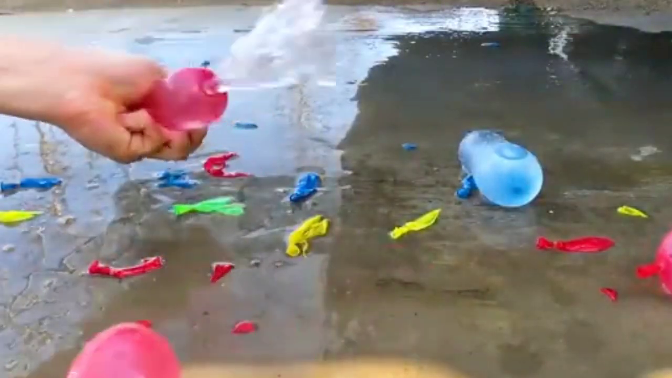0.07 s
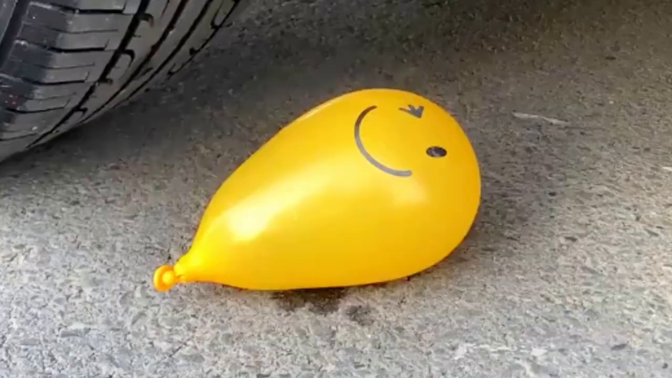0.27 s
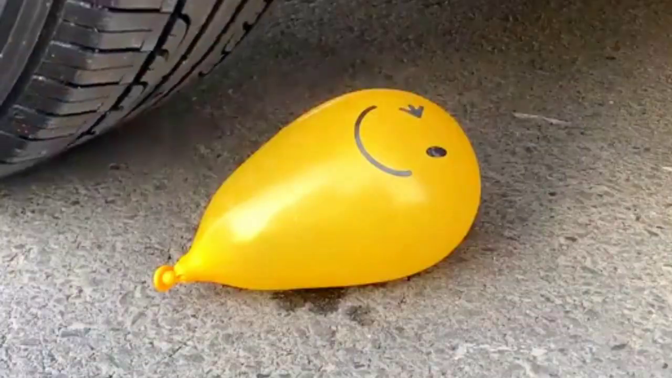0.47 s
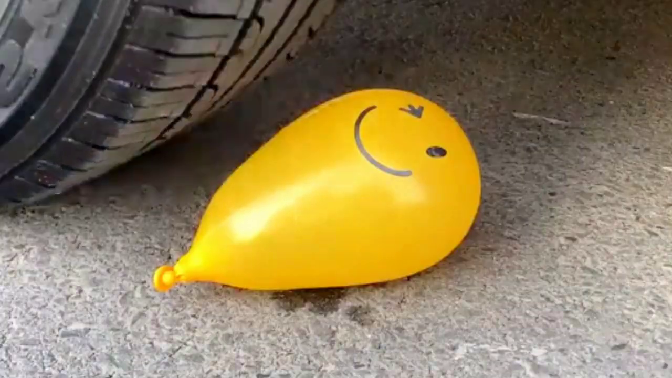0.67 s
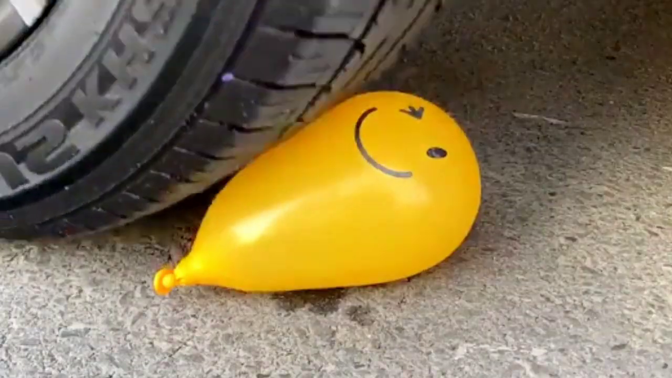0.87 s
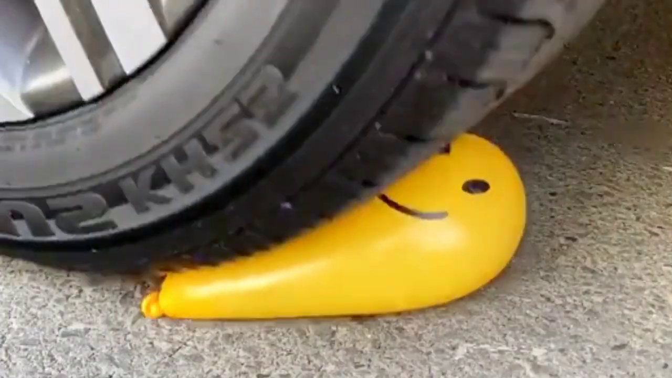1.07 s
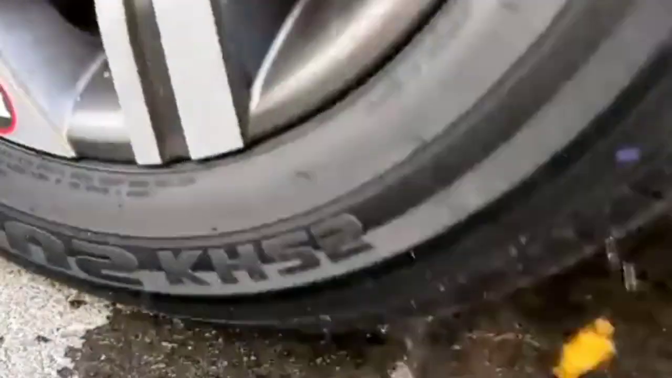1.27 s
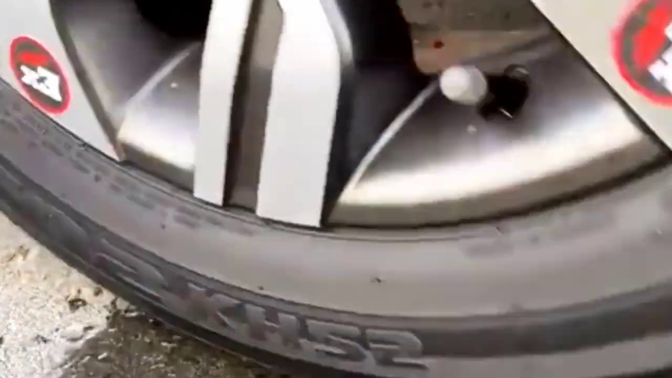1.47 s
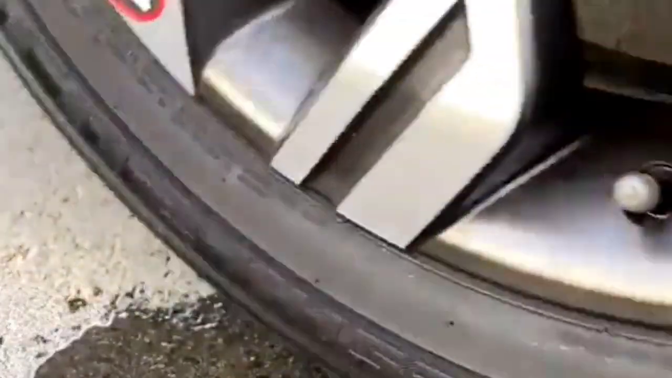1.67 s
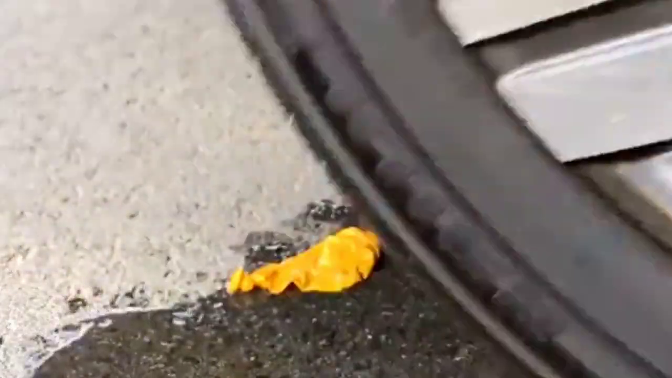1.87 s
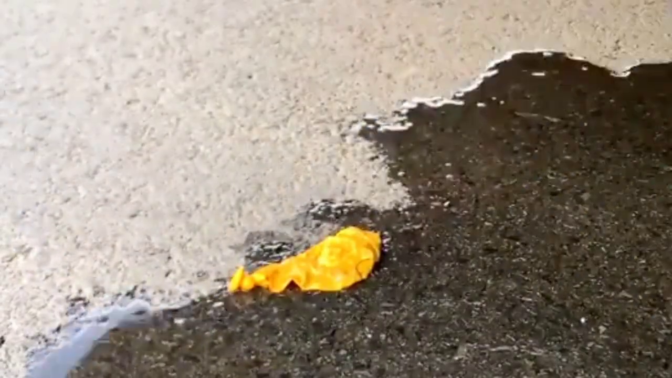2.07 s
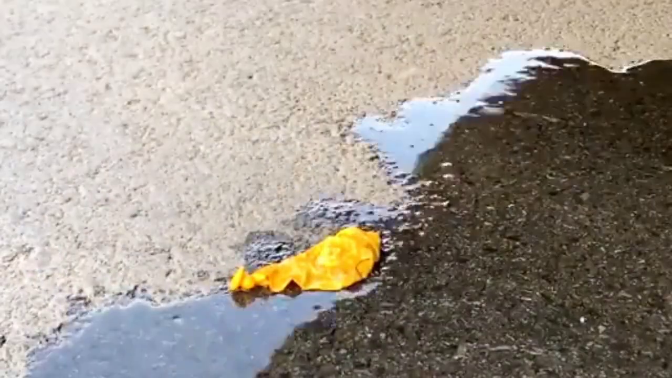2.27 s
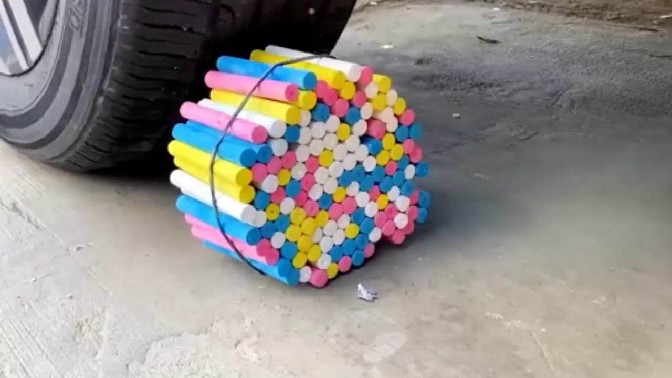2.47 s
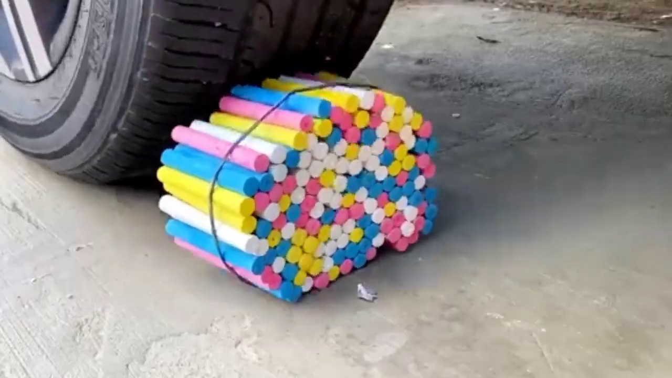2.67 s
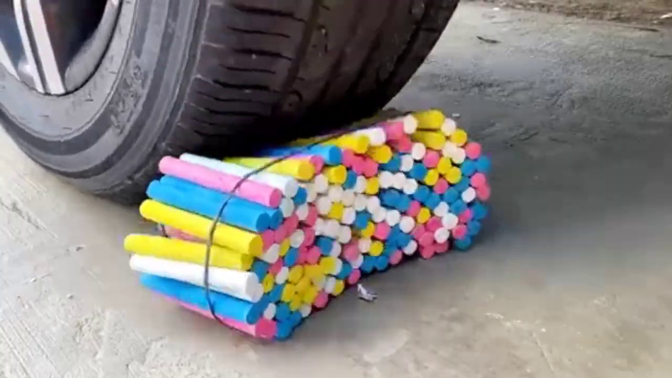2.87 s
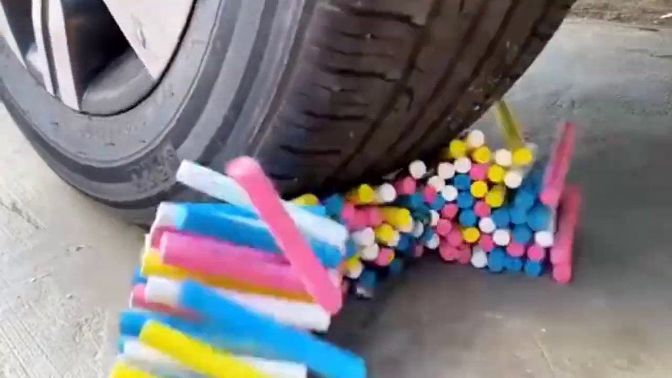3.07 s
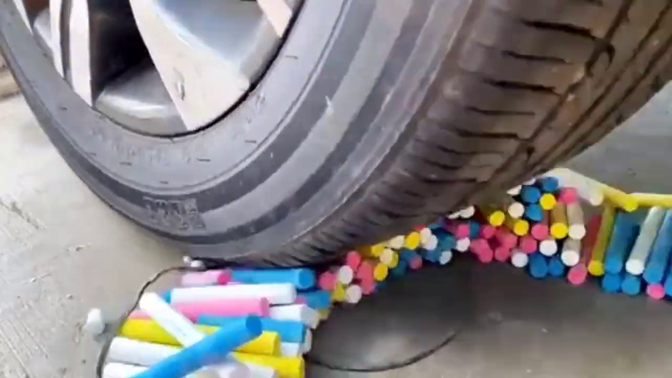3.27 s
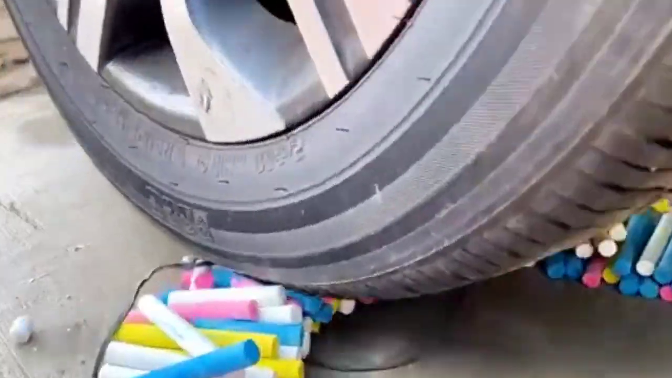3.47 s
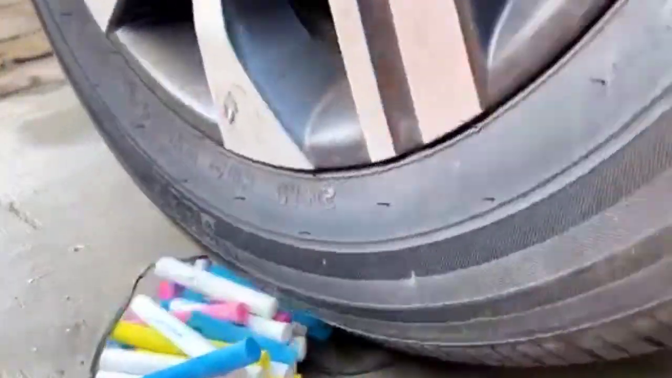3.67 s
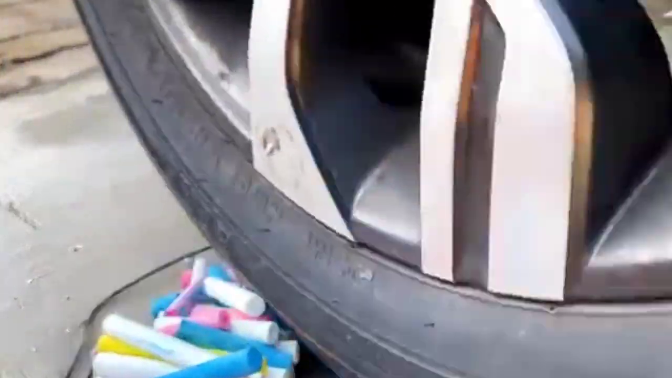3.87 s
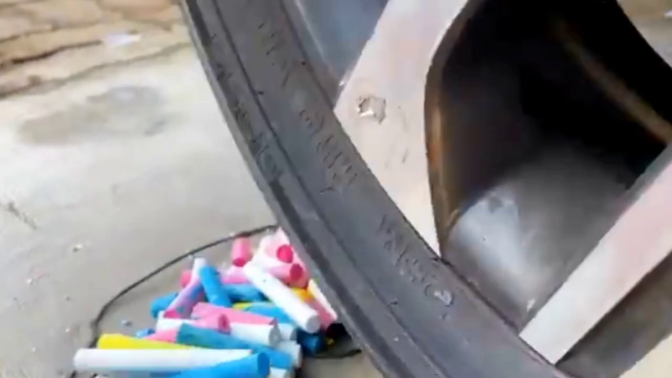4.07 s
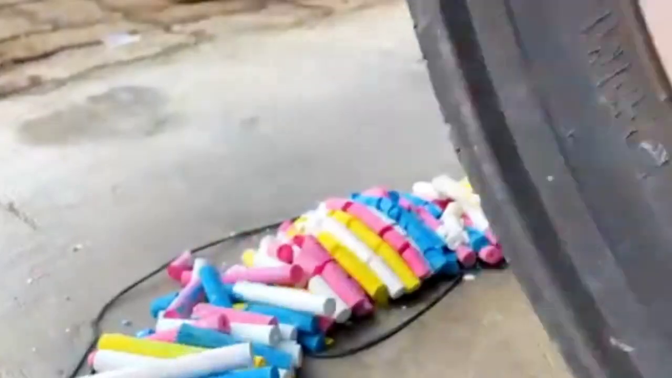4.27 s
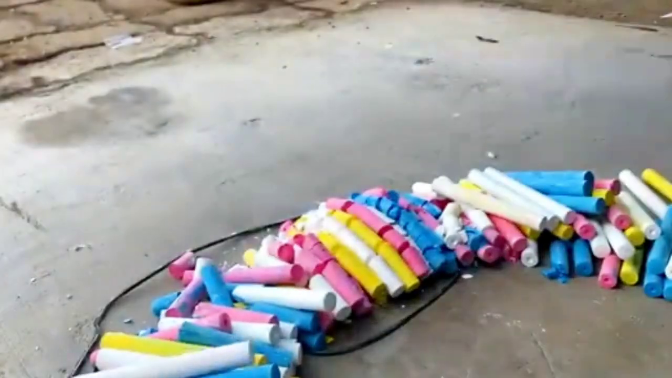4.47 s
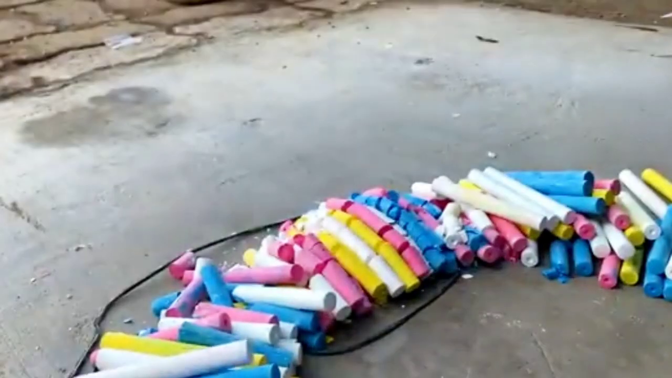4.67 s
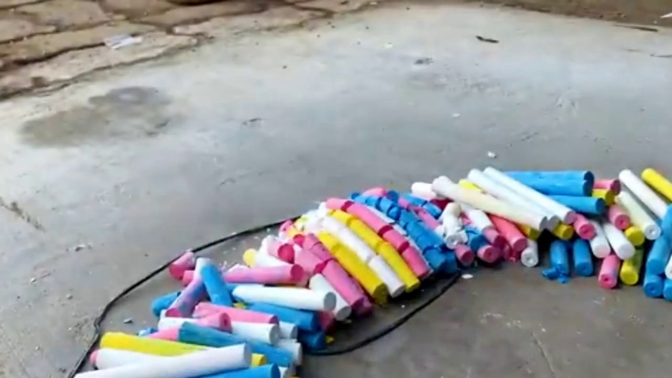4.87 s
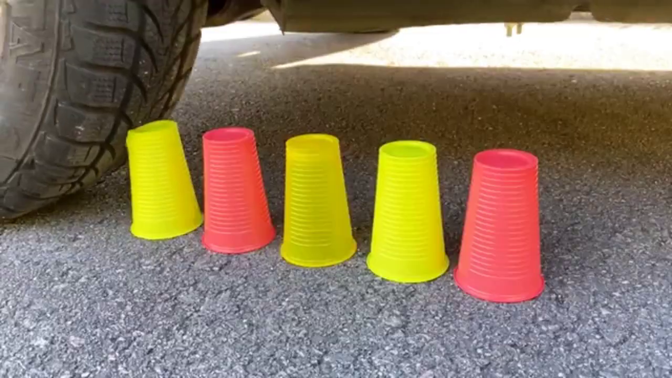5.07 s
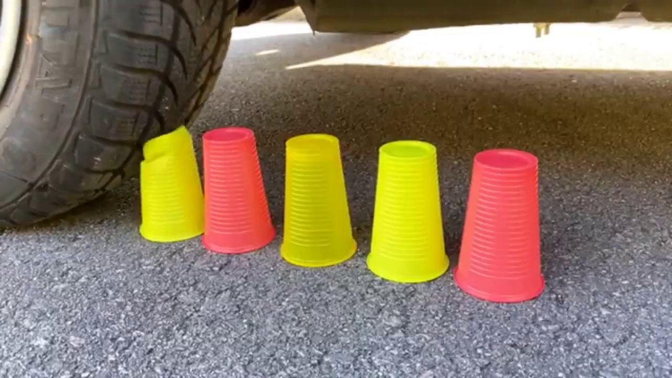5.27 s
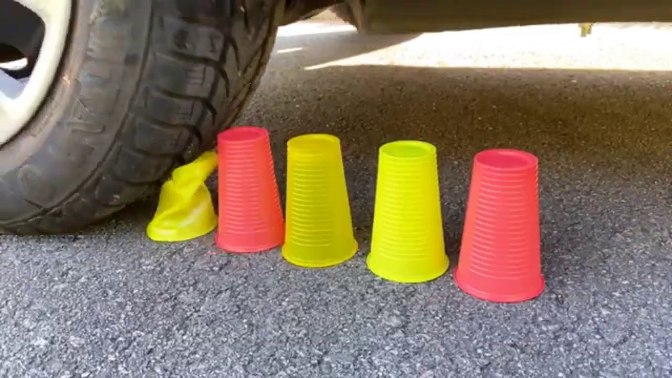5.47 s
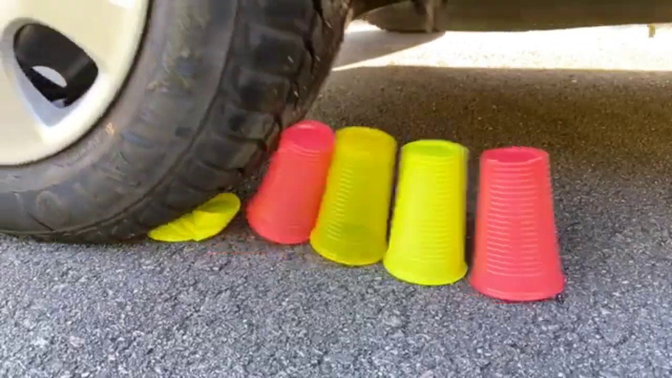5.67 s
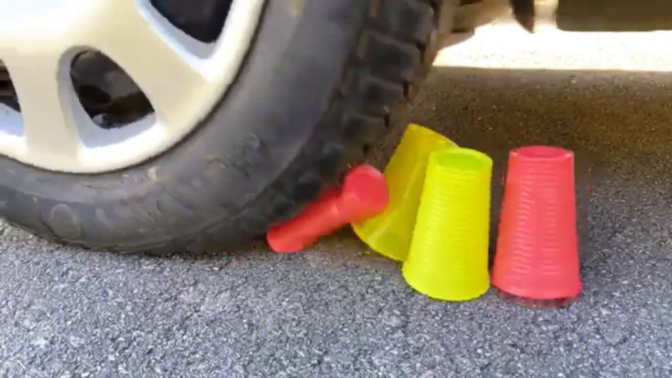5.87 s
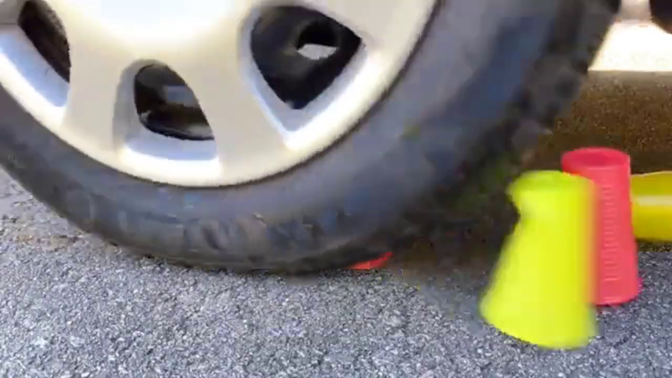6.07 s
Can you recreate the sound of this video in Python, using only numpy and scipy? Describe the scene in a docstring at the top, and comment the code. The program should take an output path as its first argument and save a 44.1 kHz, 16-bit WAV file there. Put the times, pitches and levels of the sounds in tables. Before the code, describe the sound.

A water balloon splashes, a slow tyre squeaks and bursts another, then grinds and snaps a chalk bundle and crumples plastic cups in gusting wind.

```python
"""Tyre over water balloons, chalk and cups

Four close outdoor scenes in a row. A water balloon splashes from a hand: sinking spray and chirping bubbles.
A tyre bursts another and hisses through the puddle: squeaking rubber, a rip, slaps and wet noise.
It crushes a bundle of chalk: clumped fractures grind, bar modes squeal and resonant cracks snap.
It crumples plastic cups: thin walls crackle and buckle while wind noise buffets the microphone.
Filtered noise gives the outdoor air and rolling tyres; gliding low tones give the engine."""
import sys
import numpy as np
from scipy import signal
from scipy.fft import rfft, irfft, next_fast_len
from scipy.io import wavfile
from scipy.ndimage import uniform_filter1d

SR = 44100
rng = np.random.default_rng(int(sys.argv[2]) if len(sys.argv) > 2 else 0)


def materialize(psi):
    """Save the field psi as 16-bit PCM at rate SR to the path in sys.argv[1].

    A 1-D psi becomes a single channel; in a 2-D psi each row is a channel.
    """
    bounded = np.clip(np.atleast_2d(psi).T, -1, 1)
    quanta = np.round(bounded * 32767).astype(np.int16)
    wavfile.write(sys.argv[1], SR, quanta)


N = 270774
TIME = np.arange(N) / SR
HIT_SIZE = 8192  # samples in one short sound
LEVEL_WINDOW_S = .01  # burst length that defines the level of a short sound


def undb(db):
    """Decibels to gain."""
    return 10 ** (np.asarray(db) / 20)


def unit(x):
    """Scale to an rms of one."""
    return x / np.sqrt(np.mean(x ** 2) + 1e-20)


def decay(t, t60):
    """Exponential decay that falls 60 dB in t60 seconds."""
    return np.exp(-np.log(1000) * t / t60)


def gains(table):
    """One gain curve for each dB column, silent outside the table."""
    s, *columns = np.transpose(table)
    return [undb(np.interp(TIME, s, c, left=-150, right=-150)) for c in columns]


def swell(start, end, rise_s, fall_s):
    """Attack, hold and release; rise and fall are the times for 60 dB."""
    before = (start - TIME) / max(rise_s, 1e-3)
    after = (TIME - end) / max(fall_s, 1e-3)
    return decay(np.clip(np.maximum(before, after), 0, 10), 1)


def pan(left_db):
    """Left and right gains for a level difference."""
    return undb(np.array([[left_db], [-left_db]]) / 2)


def stereo(three, likeness):
    """Two channels from one shared and two separate signals."""
    share = np.clip(likeness, 0, 1)
    return np.sqrt(share) * three[0] + np.sqrt(1 - share) * three[1:]


def response(points, size):
    """Causal frequency response through (frequency [Hz], level [dB]) points, by folding the cepstrum."""
    hz, db = np.transpose(points)
    freq = np.maximum(np.arange(size // 2 + 1) * SR / size, 1)
    target_db = np.interp(np.log(freq), np.log(hz), db)
    cepstrum = irfft(np.log(undb(target_db)))
    cepstrum[1:size // 2] *= 2
    cepstrum[size // 2 + 1:] = 0
    return np.exp(rfft(cepstrum))


def colour(x, points):
    """Give a sound a spectrum."""
    size = 2 * next_fast_len(x.shape[-1] // 2 + 1, True)
    return irfft(rfft(x, size) * response(points, size))[..., :x.shape[-1]]


def noise(points, likeness):
    """Coloured stereo noise of unit level."""
    return unit(colour(stereo(rng.standard_normal((3, N)), likeness), points))


# body, crack and fizz bands: (low edge [Hz], high edge [Hz])
BANDS = [(120, 1400), (1400, 5000), (5000, 16500)]


def band_filters():
    """Band-passes for body, crack and fizz."""
    return [signal.butter(3, edges, "band", fs=SR, output="sos") for edges in BANDS]


def band_levels(crack_db, bright_db, fizz_db, fizz_share):
    """Body, crack and fizz in dB: a brighter break has less body; fizz_share sets how fizz follows."""
    return np.array([crack_db - bright_db, crack_db, crack_db + fizz_db + fizz_share * bright_db])


def voiced(table, fizz_db, fizz_share):
    """Spread each snap of one material over body, crack and fizz."""
    return [(s, *band_levels(db, bright, fizz_db, fizz_share), *ring) for s, db, bright, *ring in table]


def bouts(table, rise_s, fall_s, fizz_db, fizz_share):
    """Body, crack and fizz gains of short bouts of crushing that share one attack and release."""
    power = 0
    for s, length, db, bright in table:
        levels = undb(band_levels(db, bright, fizz_db, fizz_share))
        power = power + np.outer(levels, swell(s, s + length, rise_s, fall_s)) ** 2
    return np.sqrt(power)


def split(force, body_db, fizz_db):
    """Body, crack and fizz gains that follow one force."""
    return np.outer(undb([body_db, 0, fizz_db]), force)


def cracks(size, rate, spread_db):
    """Three streams of tiny fractures, rate per second: many small, a few large."""
    happens = rng.random((3, size)) < rate / SR
    strength = undb(spread_db * np.minimum(rng.exponential(size=(3, size)), 4))
    return unit(happens * strength * rng.choice([-1, 1], (3, size)))


def add(out, s, sound):
    """Mix a short sound in at a time."""
    start = int(np.clip(s * SR, 0, N - 1))
    out[:, start:start + sound.shape[-1]] += sound[..., :N - start]


def blow(sound, db):
    """Scale a short sound to the energy of a 10 ms burst at this level."""
    energy = np.mean(sound ** 2) * sound.shape[-1]
    return sound * undb(db) * np.sqrt(LEVEL_WINDOW_S * SR / (energy + 1e-20))


def mode(hz, t60):
    """A ringing mode that reaches each side with its own phase."""
    t = np.arange(HIT_SIZE // 4) / SR
    phase = rng.normal(0, 1.0, (2, 1))
    return np.sin(2 * np.pi * hz * t + phase) * decay(t, t60)


def panel(size, ring_hz, ring_db, sharpness, overtone_db):
    """Response of a fragment: a main resonance and two overtones at random ratios, on a flat base."""
    freq = np.arange(1, size // 2 + 2) * SR / size
    modes = ring_hz * np.cumprod([1, *rng.uniform(1.2, 2.1, 2)])[:, None]
    resonances = 1 / (1 + 1j * sharpness * (freq / modes - modes / freq))
    return 1 + undb([ring_db, ring_db + overtone_db, ring_db + overtone_db]) @ resonances


# a faint, fast rise of noise comes just before each snap:
# start before it [s], time for 60 dB of rise [s], level [dB re the full attack]
PRE_S, PRE_RISE_S, PRE_DB = .02, .025, -17.5


def snaps(table, points, first_break, rise_s, likeness, left_db):
    """A short noise rise leads into a sharp attack that dies in fractures; shorter snaps break cleaner."""
    out = np.zeros((2, N))
    t = np.arange(HIT_SIZE) / SR - PRE_S
    material, filters = response(points, HIT_SIZE), band_filters()
    early = undb(PRE_DB) * decay(-np.minimum(t, 0), PRE_RISE_S)
    attack = np.maximum(early, np.clip(t / max(rise_s, 1e-4), 0, 1))
    release = int((PRE_S + np.clip(rise_s, 0, .005)) * SR)
    for s, *levels, t60, ring_hz, ring_db in table:
        run = cracks(HIT_SIZE, 7000, 3.2) * attack
        body = material * panel(HIT_SIZE, ring_hz, ring_db, sharpness=7.2, overtone_db=-7.5)
        for k, (db, sos) in enumerate(zip(levels, filters)):
            life = max(t60, .004) * (1.15, .95, .8)[k]  # higher bands die sooner
            force = unit(stereo(run, likeness[k]) * decay(np.maximum(t, 0), life))
            force[:, release] += first_break * np.sqrt(HIT_SIZE) * (0.025 / life) ** .7
            sound = signal.sosfilt(sos, irfft(rfft(force) * body))
            add(out, s - PRE_S - rise_s / 2, blow(sound * pan(left_db[k]), db))
    return out


def crackle(levels, points, rate, spread_db, clump_db, likeness, left_db):
    """Dense small fractures that come in clumps of a few milliseconds."""
    clumps = undb(clump_db * unit(uniform_filter1d(rng.standard_normal(N), size=220)))
    grains = colour(cracks(N, rate, spread_db) * clumps, points)
    out = 0
    for gain, sos, alike, side in zip(levels, band_filters(), likeness, left_db):
        out = out + gain * unit(signal.sosfilt(sos, stereo(grains, alike)) * pan(side))
    return out


def ticks(gain, span, low_hz, high_hz, cycles, spread_db, count):
    """Small pieces give way one by one, each with a short ring of its own pitch."""
    out = np.zeros((2, N))
    times = np.linspace(*span, count)
    for s, (late, pitch, force) in zip(times, rng.random((count, 3))):
        hz = low_hz * (high_hz / low_hz) ** pitch
        add(out, s + 0.013 * late, blow(mode(hz, cycles / hz), spread_db * force))
    sounding = (times[-1] - times[0]) * SR / N
    return unit(out) * np.sqrt(sounding) * gain


def underbody(x, t60, wet_db):
    """Short diffuse reflections between the pavement and the car."""
    t = np.arange(HIT_SIZE) / SR
    echoes = rng.standard_normal((2, HIT_SIZE)) * decay(t, t60) * (t > .003)
    reflected = signal.fftconvolve(x, unit(echoes) / np.sqrt(HIT_SIZE), axes=1)[:, :N]
    return x + undb(wet_db) * reflected


# outdoor background, each row holds until the next: (start [s], rumble [dB], roar [dB], hiss [dB])
BACKGROUNDS = [(0, -59, -51, -53), (.3, -71, -59.5, -60), (2.38, -69.5, -63.5, -61),
               (4.45, -72, -66.5, -67)]
# a tyre rolling close by: (start [s], end [s], rumble [dB], roar [dB], hiss [dB])
ROLLS = [(0.312, 1.27, -71, -57, -55), (1.422, 1.823, -60.5, -48.5, -58.5),
         (2.722, 4.418, -55.5, -49.5, -61.5)]
# the background dips briefly: (middle [s], half length [s], depth [dB])
DIPS = [(.299, 0.01, -49), (1.32, 0.036, -10), (2.383, 0.007, -13.5)]
# spectra of rumble, roar and hiss: (frequency [Hz], relative level [dB])
RUMBLE_COLOUR = [(15, -11), (42, 2), (65, -3), (130, -10.5), (200, -17), (320, -34.5)]
ROAR_COLOUR = [(100, -15), (200, -15.5), (300, -24), (420, -16), (580, 2), (740, 2), (1000, 2.5),
               (1400, -14), (3000, -22)]
AIR_COLOUR = [(500, -23), (1200, -2), (2400, 1), (4500, -4), (6000, -8.5), (7500, -3), (9200, -15),
              (11200, -7), (15000, -10)]


def car():
    """Low rumble and the soft, uneven roar of slow tyres, in a thin outdoor hiss."""
    backgrounds = np.array(BACKGROUNDS)
    current = np.searchsorted(backgrounds[1:, 0], TIME)
    levels = undb(backgrounds[:, 1:])[current].T
    for start, end, *db in ROLLS:
        rolling = swell(start, end, rise_s=0.16, fall_s=.12)
        levels = np.hypot(levels, np.outer(undb(db), rolling))
    dip_db = sum(db * np.exp(-((TIME - s) / half) ** 4) for s, half, db in DIPS)
    rumble, roar, hiss = levels * undb(dip_db)
    knots = np.arange(0, N / SR, .05)
    uneven = undb(3.0 * np.interp(TIME, knots, rng.standard_normal(len(knots))))
    out = rumble * noise(RUMBLE_COLOUR, 0.89)
    out = out + roar * uneven * noise(ROAR_COLOUR, 0.017) * pan(1.0)
    return out + hiss * noise(AIR_COLOUR, 0.03) * pan(0.85)


# low engine tones, faint at first, far louder by the cups:
# (start [s], end [s], first pitch [Hz], last pitch [Hz], level [dB])
HUM = [(0, .25, 201.5, 197, -66.5), (.32, 2.65, 198.3, 198, -88.5), (2.7, 3.3, 190, 199, -71),
       (3.7, 4.15, 212, 220, -66), (5.35, 5.44, 133.5, 145, -32), (5.43, 5.48, 248, 267, -32),
       (5.43, 5.55, 181, 191, -31), (5.56, 5.61, 194.9, 218, -30.5), (5.59, 5.9, 244, 250, -33),
       (5.68, 5.8, 197.8, 186.4, -34.5), (5.72, 5.8, 260, 274, -33)]
WAVER = .45  # depth of the engine's wavering (share)


def engine():
    """Low tones that glide and waver as the engine takes up the load."""
    out = 0
    slow = signal.butter(2, 14, fs=SR, output="sos")
    waver = unit(signal.sosfilt(slow, rng.standard_normal((2, N))))
    for start, end, first_hz, last_hz, db in HUM:
        pitch_hz = np.interp(TIME, (start, end), (first_hz, last_hz))
        phase = 2 * np.pi * np.cumsum(pitch_hz) / SR
        # wavering both in and out of phase shakes level and pitch
        tone = unit((1 + WAVER * waver[0]) * np.sin(phase) + WAVER * waver[1] * np.cos(phase))
        out = out + undb(db) * swell(start, end, rise_s=0.11, fall_s=.14) * tone
    return out


# spray from the hand-held balloon: (time [s], flow level [dB], centre [Hz])
SPRAY = [(0.038, -68, 12530), (.062, -46, 11850), (0.077, -38, 11700), (0.109, -40.5, 9840),
         (0.143, -40, 5200), (.18, -41.5, 3934), (.255, -50.5, 3450), (0.284, -46, 3550)]
# spectrum of the drops: (frequency [Hz], relative level [dB])
SPRAY_COLOUR = [(1500, -5), (2300, 0), (2800, 3.5), (4300, 12), (6000, 3), (9000, 3.5), (12000, -2),
                (16000, -17)]


def spray():
    """Fine drops hiss around a sinking centre as the water spreads, with ringing droplets among them."""
    s, db, centre_hz = np.transpose(SPRAY)
    drops = unit(colour(stereo(cracks(N, 6500, 1.4), 0.17), SPRAY_COLOUR))
    low_pass = signal.butter(2, 1300, fs=SR, output="sos")
    narrow = signal.sosfilt(low_pass, rng.standard_normal((2, N)))
    # a gliding carrier moves the narrow noise to the centre of the spray
    carrier = np.cos(2 * np.pi * np.cumsum(np.interp(TIME, s, centre_hz)) / SR)
    sweep = unit(narrow * carrier)
    flow = gains(np.column_stack([s, db]))[0]
    droplets = ticks(flow, (s[0], s[-1]), low_hz=2310, high_hz=5140, cycles=87, spread_db=9, count=70)
    return (0.5 * drops + 0.69 * sweep) * flow + undb(-9.5) * droplets


# bubbles in the splash: (time [s], pitch [Hz], rise [Hz per s], level [dB], t60 [s])
BUBBLES = [(.1938, 3030, 330000, -33.5, 0.031), (.2062, 7400, 70000, -39.5, 0.0053),
           (.2075, 4900, 390000, -40, 0.017), (.141, 3200, 10000, -40, 0.085)]


def bubbles():
    """Bubbles chirp upwards and die away as they surface."""
    out = np.zeros((2, N))
    t = np.arange(HIT_SIZE // 8) / SR
    for start, hz, rise, level_db, t60 in BUBBLES:
        chirp = np.sin(2 * np.pi * (hz + rise * t / 2) * t)
        add(out, start, blow(chirp * decay(t, t60), level_db))
    return out


# tearing rubber and slapping water; the t60 is scaled for each band:
# (time [s], body [dB], crack [dB], fizz [dB], basic t60 [s], ring [Hz], ring over the flat base [dB])
SLAPS = [(.0535, -56, -58, -41, .12, 11000, 2), (.269, -58, -42, -39.5, 0.028, 3020, -3),
         (1.256, -32.5, -18, -32.5, 0.0059, 4150, -10), (1.429, -42.5, -48, -59, 0.033, 1300, 3),
         (1.4375, -37, -50, -48, 0.018, 1480, 1)]
# their spectrum: (frequency [Hz], relative level [dB])
SLAP_COLOUR = [(200, -50.5), (600, -17), (1200, -16.5), (2200, -2), (3400, 8), (4500, 5.5), (6500, -1.5),
               (9000, 2), (11500, 10), (16000, -10.5)]


def slaps():
    """Rubber tears and the water slaps down, each a resonant burst of fractures."""
    return snaps(SLAPS, SLAP_COLOUR, first_break=0.18, rise_s=0.00059, likeness=(.4, .8, .5),
                 left_db=(4, 2.1, .8))


# the skin rips open and whips back: (time [s], level [dB])
RIP = [(1.228, -55), (1.24, -36), (1.25, -30.5), (1.2575, -22.5), (1.264, -32), (1.274, -41.5),
       (1.281, -53.5), (1.305, -62)]
# its spectrum: (frequency [Hz], relative level [dB])
RIP_COLOUR = [(500, -23.5), (1800, -15), (2500, 1), (3450, 0), (4400, 1.5), (5600, -17), (7000, -13.5),
              (9000, -27), (12000, -22), (16000, -29)]


def rip():
    """The tearing skin as a short swell of coloured noise."""
    return gains(RIP)[0] * noise(RIP_COLOUR, .6)


# stretched rubber squeaking under the tread just before the burst: (time [s], pitch [Hz], level [dB])
SQUEAK = [(1.232, 3500, -49), (1.242, 3493, -31.5), (1.246, 3495, -23), (1.25, 3423, -25),
          (1.255, 3310, -16), (1.256, 3200, -29.5)]
SQUEAK_OCTAVE_DB, SQUEAK_WANDER = -9, .033  # octave re the tone, rms pitch wander (share)


def squeak():
    """Rubber sticks and slips on the tread: a rough tone with its octave, sinking as the skin gives way."""
    s, hz, db = np.transpose(SQUEAK)
    slip = unit(uniform_filter1d(rng.standard_normal(N), size=30))
    pitch_hz = np.interp(TIME, s, hz) * (1 + SQUEAK_WANDER * slip)
    phase = 2 * np.pi * np.cumsum(pitch_hz) / SR
    tone = unit(np.sin(phase) + undb(SQUEAK_OCTAVE_DB) * np.sin(2 * phase))
    return gains(np.column_stack([s, db]))[0] * tone


# wet tread hissing: (time [s], level [dB])
WET = [(1.33, -59), (1.40, -49.5), (1.445, -43), (1.52, -48.5), (1.82, -54.5), (1.84, -68)]
# its spectrum: (frequency [Hz], relative level [dB])
WET_COLOUR = [(500, -25), (1100, -1.5), (2500, 1), (4000, -2), (6000, -8), (7500, -6.5), (9200, -15),
              (11500, -7.5), (16000, -26)]


def wet_tread():
    """The tread squeezes through the water: a wide hiss of tiny bursts."""
    hiss = unit(colour(stereo(cracks(N, 6300, 0.74), 0.042), WET_COLOUR))
    return gains(WET)[0] * hiss * pan(7.3)


def balloons():
    """Rubber squeaks and tears, the water sprays and slaps, and the tread squeezes through it."""
    rubber = (squeak() + rip()) * pan(2.1)
    return rubber + slaps() + wet_tread() + spray() + bubbles()


# chalk sticks squealing as they skid: (time [s], length [s], first bending mode [Hz], second mode [Hz],
# first level [dB], second level [dB], glide [octaves per s])
SQUEALS = [(2.866, .0079, 3585, 7060, -46, -30, 0), (3.161, .13, 2980, 7220, -30, -26.5, -0.75),
           (3.205, .035, 2790, 7520, -40, -20, 1), (3.266, 0.023, 2750, 6960, -39, -23, -0.5),
           (3.314, .018, 2765, 7340, -34, -39, -0.5), (3.355, 0.038, 2780, 6870, -50, -28, 1.5),
           (3.41, 0.06, 2607, 6650, -37.5, -41.5, 0.7), (3.441, .052, 2650, 6860, -31, -41, 2.2),
           (3.494, .012, 3430, 7150, -31, -48.5, 0.5), (3.82, .02, 2760, 7200, -45, -47.5, -2.5),
           (3.909, 0.021, 2890, 7270, -37.5, -52, 0), (4.028, 0.0085, 3240, 7580, -50.5, -23.5, -1),
           (4.088, 0.039, 2900, 8100, -46, -57, 0), (4.378, 0.0226, 3736, 9240, -36, -44, 0)]
SQUEAL_STRANDS = 4  # sticks that skid together in one squeal


def squeals(t60, wander, third_db, strands):
    """Stick-slip keeps neighbouring sticks ringing in bending modes; longer skids wander more in pitch."""
    out = np.zeros((2, N))
    t = np.arange(HIT_SIZE) / SR
    for s, length, first_hz, second_hz, first_db, second_db, glide in SQUEALS:
        bend = 2 ** (glide * np.minimum(t, length))
        contact = np.minimum(t / .005, 1) * decay(np.maximum(t - length, 0), t60)
        duration = np.sqrt(abs(length) / LEVEL_WINDOW_S)
        modes = ((first_hz, first_db), (second_hz, second_db), (1.76 * second_hz, second_db + third_db))
        for hz, db in modes:
            slip = unit(uniform_filter1d(rng.standard_normal((strands, 1, HIT_SIZE)), size=110))
            pitch_hz = hz * bend * (1 + wander * duration * slip)
            phase = 2 * np.pi * (np.cumsum(pitch_hz, axis=-1) / SR + rng.random((strands, 1, 1)))
            side_phase = rng.normal(0, 1.0, (strands, 2, 1))
            tone = np.sin(phase + side_phase).sum(axis=0) * contact
            add(out, s, blow(tone, db) * duration)  # a longer skid carries more energy
    return out * pan(1.4)


def jostle(gain, span, pitch_hz, scatter, t60, first_db, third_db, count):
    """Many sticks of nearly equal length slide and ring in the three lowest modes of a free bar."""
    out = np.zeros((2, N))
    times = np.linspace(*span, count)
    for s, (late, length, force) in zip(times, rng.uniform(-1, 1, (count, 3))):
        hz = pitch_hz * (1 + scatter * length)
        ring = undb(first_db) * mode(hz, t60)
        ring = ring + mode(2.52 * hz, t60)
        ring = ring + undb(third_db) * mode(4.45 * hz, t60 / 2)
        add(out, s + 0.0019 * late, ring * undb(17 * force))
    sounding = (times[-1] - times[0]) * SR / N
    return unit(out) * np.sqrt(sounding) * gain * pan(1.5)


def lead_right(x):
    """Delay the left side by one sample, so the right leads."""
    return np.stack([np.roll(x[0], 1), x[1]])


# snapping chalk; brightness is crack over body, the t60 is scaled for each band:
# (time [s], crack [dB], brightness [dB], basic t60 [s], ring of the fragment [Hz])
CHALK_SNAPS = [(2.667, -46.5, 8, 0.033, 3020), (2.705, -33.5, 9.5, 0.081, 3280),
               (2.74, -33.5, 5.5, 0.22, 2270), (2.789, -33.5, 14, 0.011, 7000),
               (2.87, -38.5, 8, .015, 3100), (2.935, -29, 8, .07, 2970), (2.984, -27, 8, .07, 2670),
               (2.991, -20, 7, .032, 3020), (3.019, -34, 10, 0.086, 2870), (3.1155, -15, 6, 0.037, 4470),
               (3.122, -13.5, 16, 0.17, 2920), (3.141, -23, 18, 0.056, 6700),
               (3.306, -33.5, 2, 0.086, 2510), (3.355, -35, -2, 0.035, 1510),
               (3.383, -34.5, 4, 0.036, 7200), (3.432, -29.5, 4.5, 0.068, 5050),
               (3.501, -40, -12, .023, 814), (3.505, -37, -11, 0.023, 874), (3.53, -41, -13, 0.027, 700),
               (3.5675, -19, 6, 0.014, 4930), (3.6487, -20, -2.5, 0.0056, 1590),
               (3.677, -36, -7.5, 0.065, 750), (3.728, -42, -10, 0.028, 1000),
               (3.757, -48, -10, 0.016, 800), (3.792, -38, 5, 0.024, 5120), (3.849, -28, -9, 0.0081, 1660),
               (3.87, -41.5, -7.5, .02, 1800), (3.924, -32.5, 2, .095, 1000),
               (3.945, -33.5, -1.5, 0.01, 1000), (3.9995, -38, 27, 0.11, 8150),
               (4.135, -55, -14.5, .061, 780), (4.391, -46, 19, 0.038, 3725)]
# clusters of sticks giving way: (time [s], length [s], crack [dB], brightness [dB])
CRUNCHES = [(2.81, 0.02, -31.5, 18), (2.955, 0.042, -32.5, 11), (3.07, 0.008, -25.5, -4),
            (3.255, 0.028, -30, 5), (3.365, 0.022, -36, -5.5), (3.52, 0.079, -38.5, -8),
            (3.68, .02, -41, 12), (3.93, 0.014, -40.5, -6), (4.04, 0.049, -52, 24),
            (4.17, 0.021, -46.5, -5), (4.37, 0.048, -52, 4)]
# spectra of grinding and of snapping: (frequency [Hz], relative level [dB])
CHALK_COLOUR = [(200, -21), (350, -28.5), (500, -15), (650, -1.5), (850, 1), (1300, -10.5), (2100, 1.5),
                (3000, 2), (4100, -4), (5200, -4.5), (7000, -6), (9200, -9), (11700, -9), (16000, -25)]
SNAP_COLOUR = [(150, -38), (370, -32), (520, -11.5), (700, 1.5), (1000, -3), (1500, -6.5), (3000, 2),
               (5500, -17.5), (7200, -9), (9200, -22.5), (11800, -10), (16000, -30.5)]
# the bundle collapses under the tyre, then spills, while the tread rides on broken chalk (s, s, dB)
COLLAPSE_START_S, COLLAPSE_END_S, COLLAPSE_DB = 3.028, 3.125, -20.5
SPILL_START_S, SPILL_END_S, SPILL_DB = 3.17, 3.241, -23.5
RIDE_START_S, RIDE_END_S, RIDE_DB = 2.696, 4.138, -48.5
FRAGMENT_RING_DB = 0  # resonance of a fragment over its flat base
STICK_SCATTER = .075  # half the range of pitch between sticks (share)


def chalk():
    """The bundle grinds and rings as it collapses; sticks also squeal and snap under the tread."""
    span = (2.62, 4.46)
    sides = dict(likeness=(.4, .25, .2), left_db=(3.5, 2.1, 1.1))
    collapse = undb(COLLAPSE_DB) * swell(COLLAPSE_START_S, COLLAPSE_END_S, rise_s=0.46, fall_s=0.68)
    ride = undb(RIDE_DB) * swell(RIDE_START_S, RIDE_END_S, rise_s=0.26, fall_s=1.0)
    spill = undb(SPILL_DB) * swell(SPILL_START_S, SPILL_END_S, rise_s=0.77, fall_s=0.63)
    spill = spill + undb(-10.5) * ride

    crush_bands = split(collapse, body_db=-9.0, fizz_db=-1.5)
    crush = crackle(crush_bands, CHALK_COLOUR, rate=2800, spread_db=2.4, clump_db=2.5, **sides)
    crunches = bouts(CRUNCHES, rise_s=0.075, fall_s=0.086, fizz_db=-0.5, fizz_share=0.14)
    load = np.hypot(split(ride, body_db=-4.5, fizz_db=-3.5), crunches)
    grind = crackle(load, CHALK_COLOUR, rate=2100, spread_db=1.5, clump_db=3.0, **sides)
    crumbs = ticks(np.hypot(load[1], collapse), span, low_hz=1564, high_hz=6410, cycles=110,
                   spread_db=12.5, count=450)
    fragments = [(*row, FRAGMENT_RING_DB) for row in voiced(CHALK_SNAPS, fizz_db=0.5, fizz_share=0.34)]
    breaks = snaps(fragments, SNAP_COLOUR, first_break=0.52, rise_s=.0006, likeness=(.85, .6, .4),
                   left_db=(4.5, 2.5, 1.2))
    sliding = jostle(spill, span, pitch_hz=2845, scatter=STICK_SCATTER, t60=0.06, first_db=-2.5,
                     third_db=-2.5, count=700)
    skids = squeals(t60=.018, wander=.014, third_db=-14.5, strands=SQUEAL_STRANDS)
    return lead_right(crush + grind + undb(-9.5) * crumbs + breaks + sliding + skids)


# the tread presses on the cups, ever harder
PRESS_START_S, PRESS_DB, PRESS_DB_PER_S = 4.99, -50, 4.5


def cup_span():
    """Gain that opens as the cups come in and holds to the end."""
    return swell(PRESS_START_S, N / SR, rise_s=0.01, fall_s=.1)


# buckling cup walls; brightness is crack over body, the t60 is scaled for each band:
# (time [s], crack [dB], brightness [dB], basic t60 [s], ring of the wall [Hz], ring over the flat base [dB])
CUP_SNAPS = [(5.1155, -27, -8.5, .04, 1820, 11), (5.188, -26.5, -10.5, 0.033, 1740, -3),
             (5.213, -35.5, -6.5, 0.023, 3750, -3), (5.253, -29.5, -5.5, .035, 1320, 1),
             (5.292, -31.5, -8.5, .074, 1900, 2), (5.359, -24.5, -0.5, 0.091, 6250, 15),
             (5.371, -31, -11, .03, 760, 5), (5.451, -28.5, -4, 0.03, 3680, 6),
             (5.486, -35, -10.5, 0.044, 890, 10), (5.532, -26, 2, 0.071, 1870, 24),
             (5.5525, -24.5, -4, 0.044, 1130, 17), (5.59, -29.5, -9.5, 0.087, 780, -3),
             (5.6445, -21.5, 4.5, 0.036, 1370, -4), (5.695, -34.5, -17, 0.04, 930, 12),
             (5.7072, -18, -6, 0.096, 4384, 6), (5.737, -24.5, -4.5, 0.081, 3235, 5),
             (5.8046, -22.5, 11, 0.013, 1590, 26), (5.859, -26.5, 11, 0.072, 5190, 3),
             (5.921, -26.5, 8, 0.012, 4785, 16), (5.959, -15.5, -3, 0.03, 1950, -2),
             (5.9665, -24, -10.5, 0.013, 3360, 11), (5.976, -32.5, -15.5, 0.033, 990, 24),
             (6.017, -32, -0.5, 0.068, 5700, -5), (6.0685, -28, -4.5, 0.037, 1960, -8),
             (6.1054, -26, -0.5, 0.015, 4334, -15)]
# crumpling of the cups: (time [s], length [s], crack [dB], brightness [dB])
CRUMPLES = [(5.1, 0.011, -47, -14), (5.32, 0.0058, -34.5, 21), (5.385, 0.023, -38, -8),
            (5.47, 0.032, -29.5, -3.5), (5.66, 0.012, -28, 4), (5.75, 0.077, -35, -7),
            (5.84, 0.105, -36, -6.5), (6.035, 0.013, -35.5, -2.5), (6.085, 0.067, -34, -5)]
# spectrum of the thin walls: (frequency [Hz], relative level [dB])
CUP_COLOUR = [(150, -10), (400, -3.5), (620, 7.5), (1000, 0), (1500, -7), (2500, -13.5), (4500, -20),
              (7000, -25.5), (9000, -38.5), (11500, -38.5), (15000, -66)]


def cups():
    """Thin cup walls crinkle, crease and buckle under a growing press."""
    press = cup_span() * undb(PRESS_DB + PRESS_DB_PER_S * (TIME - PRESS_START_S))
    crumples = bouts(CRUMPLES, rise_s=0.16, fall_s=0.11, fizz_db=-11.0, fizz_share=-0.12)
    load = np.hypot(split(press, body_db=-0.5, fizz_db=-11.5), crumples)
    crinkle = crackle(load, CUP_COLOUR, rate=1500, spread_db=1.5, clump_db=2.5,
                      likeness=(.55, .4, .15), left_db=(-.8, -.4, .1))
    creases = ticks(load[1], (PRESS_START_S, N / SR), low_hz=846, high_hz=4450, cycles=43,
                    spread_db=22, count=200)
    walls = voiced(CUP_SNAPS, fizz_db=-11.5, fizz_share=-0.072)
    buckles = snaps(walls, CUP_COLOUR, first_break=0.4, rise_s=0.001191, likeness=(.75, .55, .2),
                    left_db=(-.4, .1, .1))
    return crinkle + undb(-7.0) * creases + buckles


BREEZE_END_S, BREEZE_DB, LULL_DB = 5.96, -34, -54  # the lull is the wind's constant floor


def breeze():
    """Envelope of the breeze beside the cups."""
    return swell(PRESS_START_S, BREEZE_END_S, rise_s=0.015, fall_s=0.05)


# gusts on the microphone: (time [s], level [dB])
GUSTS = [(4.995, -21), (5.24, -17.5), (5.369, -23), (5.45, -23), (5.695, -22.5), (5.941, -30.5)]
# spectrum of the wind: (frequency [Hz], relative level [dB])
WIND_COLOUR = [(20, -12), (42, 5), (90, 5), (140, 1.5), (250, -29), (600, -73.5)]


def wind():
    """Air buffets the microphone: low noise that swells with each gust over a breeze."""
    gusts = sum(undb(db) * swell(s, s, rise_s=0.026, fall_s=0.095) for s, db in GUSTS)
    strength = cup_span() * (undb(BREEZE_DB) * breeze() + gusts + undb(LULL_DB))
    return strength * noise(WIND_COLOUR, 0.95)


# spectrum of the engine's drone: (frequency [Hz], relative level [dB])
DRONE_COLOUR = [(90, -29), (140, 0), (165, -1.5), (185, 3.5), (215, -2.5), (250, 4.5), (290, -3.5),
                (450, -11.5), (800, -68)]
PULL_START_S, PULL_END_S, PULL_DB = 5.214, 5.71, -32


def drone():
    """The engine pulls through the breeze: a swell of low humming noise over a faint constant share."""
    pull = breeze() * swell(PULL_START_S, PULL_END_S, rise_s=1.22, fall_s=1.35)
    strength = undb(PULL_DB) * (pull + undb(-23.0) * cup_span())
    return strength * noise(DRONE_COLOUR, 0.71)


CHALK_CUT_S = 4.42  # the chalk starts its quick fade


def scene():
    """Hand-held balloon, burst balloon, chalk and cups in a row, over the car and its engine."""
    sticks = underbody(chalk(), t60=0.13, wet_db=-9.5)
    sticks = sticks * swell(0, CHALK_CUT_S, rise_s=.02, fall_s=0.047)
    crumpling = underbody(cups() + wind() + drone(), t60=0.077, wet_db=-11.5)
    return car() + engine() + balloons() + sticks + crumpling


TOP_HZ = 16200


def record(dry):
    """The loudest peaks clip and the top is cut."""
    top_cut = signal.ellip(8, .2, 70, TOP_HZ, fs=SR, output="sos")
    return signal.sosfilt(top_cut, np.clip(dry, -1, 1))


dry = scene()
out = record(dry)
materialize(out)
```